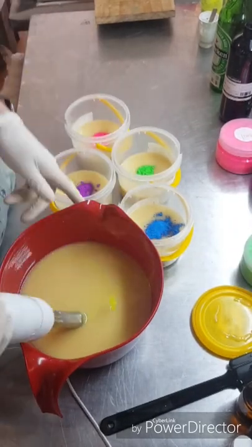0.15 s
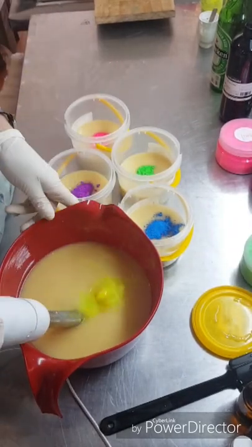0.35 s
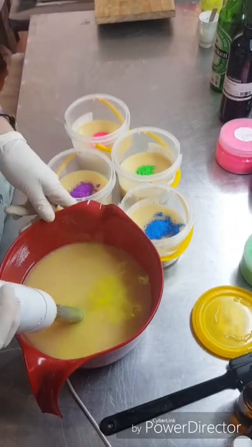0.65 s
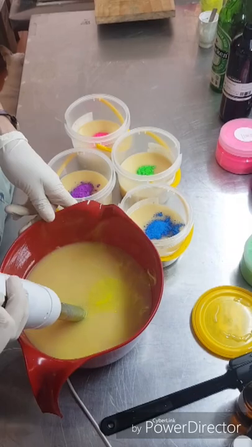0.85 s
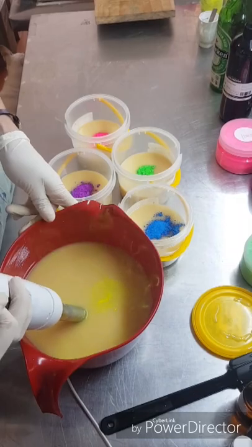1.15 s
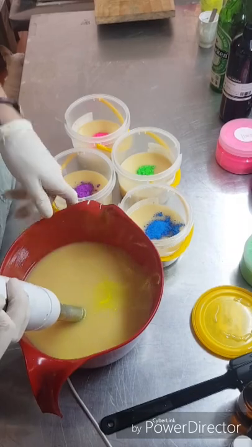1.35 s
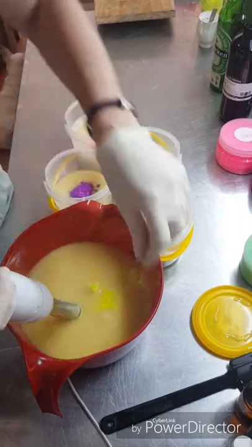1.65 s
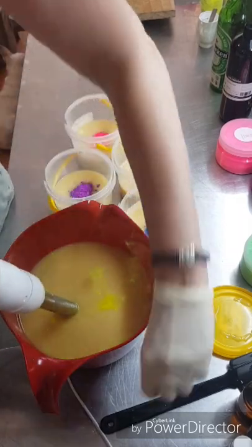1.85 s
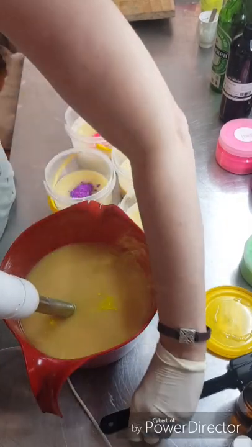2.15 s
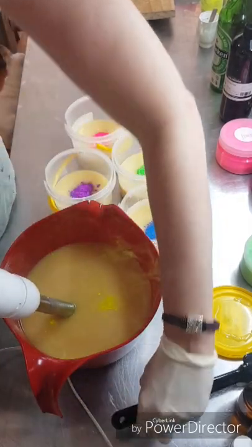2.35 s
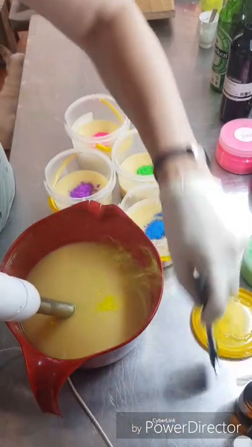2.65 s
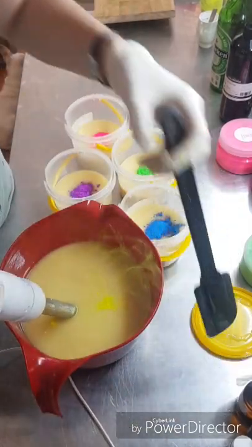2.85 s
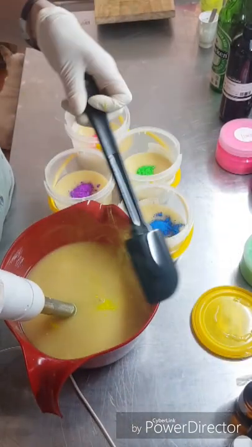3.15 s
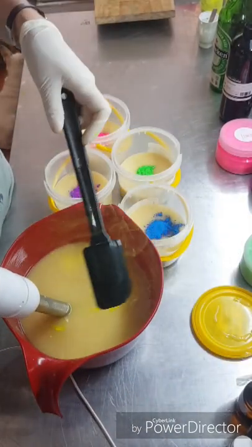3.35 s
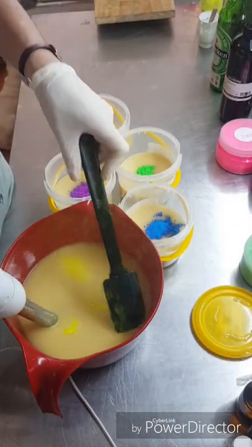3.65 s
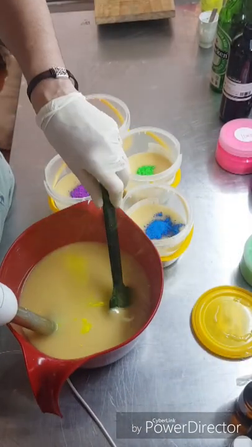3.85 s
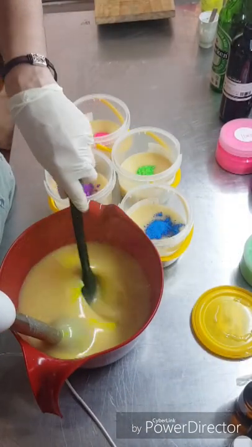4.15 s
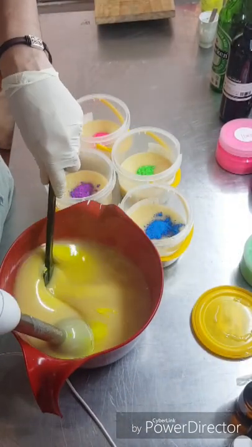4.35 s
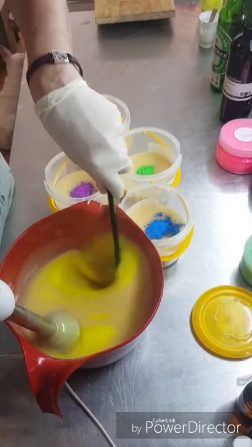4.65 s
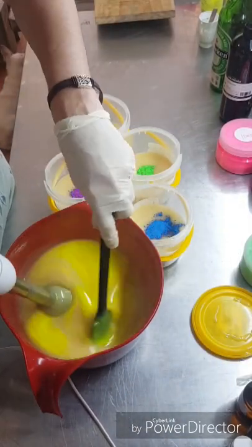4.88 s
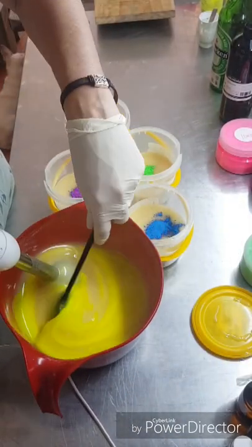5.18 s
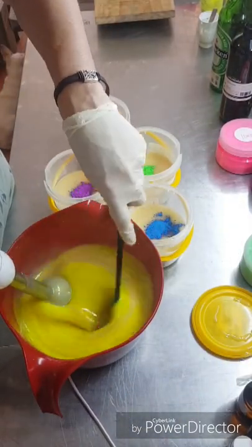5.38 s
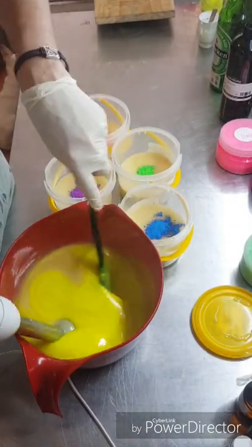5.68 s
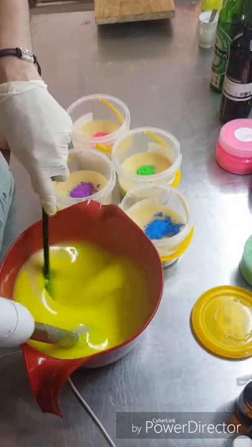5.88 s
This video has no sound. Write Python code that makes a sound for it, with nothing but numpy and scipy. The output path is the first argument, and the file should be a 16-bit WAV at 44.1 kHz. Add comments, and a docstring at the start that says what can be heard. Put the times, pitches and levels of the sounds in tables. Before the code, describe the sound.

Hollow, chattering clacks with thin metal rings and a dull jug bump open the scene, with one small rising bubble. A stick blender then makes a short throbbing burst and a longer one in thick batter. After a pause with faint rubbing on steel comes another short-long pair, settling to a buzz. Soft quick knocks and tiny wet crackles of stirring follow. Close stereo microphones, small workroom, low hum.

```python
"""A stick blender runs in four presses in a plastic jug of thick batter, on a steel table close to two microphones.
Tones, churning and brushes follow one shaft speed: the blades gulp air and throb; longer presses settle to a buzz.
Loose ware rattles as decaying knocks and metal rings; the jug thumps when bumped and bubbles chirp upwards.
A spatula rubs the steel, squeaks and stirs with faint wet crackles of short noise.
Beneath it all, a small workroom holds a low hum and steady noise."""
import sys
import numpy as np
from scipy import signal
from scipy.fft import rfft, irfft, next_fast_len
from scipy.io import wavfile
from scipy.ndimage import uniform_filter1d

SR = 44100
rng = np.random.default_rng(int(sys.argv[2]) if len(sys.argv) > 2 else 0)


def store_pcm(level_fs):
    """Save levels as 16-bit WAV."""
    pcm = np.round(np.clip(level_fs, -1, 1) * 32767).astype(np.int16)
    wavfile.write(sys.argv[1], SR, np.atleast_2d(pcm).T)


N = 265482


def amp(db):
    """Decibels to gain."""
    return 10 ** (np.asarray(db) / 20)


def unit(x):
    """Scales to rms 1."""
    return x / np.sqrt(np.mean(x ** 2) + 1e-20)


def read(points, hz):
    """Reads a spectrum on a log-frequency axis."""
    f, value = np.transpose(points)
    return np.interp(np.log(hz + 1), np.log(f + 1), value)


def add(mix, s, sound):
    """Mixes a sound in at time s."""
    part = mix[..., max(round(s * SR), 0):][..., :sound.shape[-1]]
    part += sound[..., :part.shape[-1]]


def colour(x, gain):
    """Filters with a gain given as a function of frequency."""
    size = next_fast_len(x.shape[-1] + 2048)
    spectrum = rfft(x, size) * gain(np.fft.rfftfreq(size, 1 / SR))
    return irfft(spectrum, size)[..., :x.shape[-1]]


def wander(rate_hz):
    """Smooth random drift of rms 1."""
    return unit(colour(rng.standard_normal(N), lambda hz: np.exp(-(hz / rate_hz) ** 2)))


def lag(x, seconds):
    """Follows x with a time constant."""
    keep = np.exp(-1 / (seconds * SR))
    return signal.lfilter([1 - keep], [1, -keep], x)


def resonance(hz, centre_hz, width_hz):
    """Bell of height 1 around a resonance."""
    return 1 / (1 + (2 * (hz - centre_hz) / width_hz) ** 2)


# likeness of the two microphones: (frequency [Hz], left-right correlation [-1 to 1])
LIKENESS = [(60, -0.14), (140, 0.6), (330, 0.27), (500, 0.42), (770, 0), (1200, -0.06), (2700, 0.25),
            (4200, -0.03), (15000, 0)]


def noise(spectrum, peaks=(), size=N):
    """Coloured noise of rms 1 at both microphones, their likeness set band by band."""
    a, b = rng.standard_normal((2, size))
    same = lambda hz: np.clip(read(LIKENESS, hz), -1, 1)
    right = colour(a, same) + colour(b, lambda hz: np.sqrt(1 - same(hz) ** 2))
    lift = lambda hz: sum(db * resonance(hz, f, width) for f, width, db in peaks)
    return unit(colour(np.array([a, right]), lambda hz: amp(read(spectrum, hz) + lift(hz))))


def fade(t, t60):
    """Free decay, 60 dB in t60."""
    return np.exp(-np.log(1000) * t / t60)


def ring(modes, t, vary_db=1):
    """Struck modes, a little different at every blow."""
    out = 0
    for k, (hz, db, t60) in enumerate(modes):
        level = amp(db + vary_db * rng.standard_normal())
        out = out + (-1) ** k * level * fade(t, t60) * np.sin(2 * np.pi * hz * t)
    return out


def room(x, wet_db=-13, t60=0.095, near_db=-9):
    """Early echoes off the table and nearby things, then a short tail."""
    t = np.arange(SR // 2) / SR
    taps = rng.choice([-1., 1.], (2, len(t))) * (rng.random((2, len(t))) < 3000 / SR)
    early = taps * (t > .001) * fade(t, 0.063)
    late = taps * (t > .012) * fade(t, t60)
    echoes = sum(amp(db) * h / np.linalg.norm(h, axis=1, keepdims=True)
                 for db, h in ((near_db, early), (wet_db, late)))
    return x + signal.oaconvolve(np.atleast_2d(x), echoes, axes=1)[:, :N]


# share of a phase offset given to each of the two microphones: ([share])
SIDES = np.array([[.5], [-.5]])
# low hum: (frequency [Hz], rms level [dB], phase between the microphones [rad])
HUM = [(48.2, -58, 0.72), (103.1, -55, 0.47), (126, -69.5, 1.2)]
# steady noise of the workroom: (frequency [Hz], level per Hz [dB])
ROOM_NOISE = [(12, -47.5), (20, -17.5), (106, -6), (129, -16), (153, -21), (245, -35), (315, -28.5),
              (416, -36), (491, -37), (811, -46), (3260, -54.5), (4430, -55.5), (7110, -59), (12800, -53.5),
              (15500, -64)]


def background():
    """An appliance hums, its level drifting, over the room's steady noise."""
    t = np.arange(N) / SR
    hum = 0
    for hz, db, apart in HUM:
        phase = 2 * np.pi * (hz * t + rng.random()) + apart * SIDES
        hum = hum + amp(db + .8 * wander(10)) * np.sqrt(2) * np.sin(phase)
    return hum + amp(-57) * noise(ROOM_NOISE)


# loose ware knocks on the table: (time [s], level [dB], metal ring level relative to the knock [dB])
KNOCKS = [(0.005, -28.5, -16), (0.087, -41.5, -19), (0.152, -41.5, -21), (0.197, -48, -26),
          (0.265, -46.5, -29), (0.407, -23.5, -14.5), (0.47, -33.5, -48), (0.485, -28.5, -16),
          (0.624, -26.5, -15), (0.704, -30, -18.5), (2.283, -36, -26), (2.368, -41, -24.5),
          (2.47, -53, -27), (2.553, -46.5, -23.5), (3.757, -42, -18), (3.823, -43, -19.5),
          (3.901, -35.5, -18.5), (3.976, -40, -16.5), (4.049, -39.5, -20), (4.118, -44, -23),
          (4.19, -42, -20.5), (4.263, -48, -22.5), (4.322, -44.5, -26), (4.806, -57.5, -27),
          (5.149, -42, -20.5), (5.236, -41.5, -19.5), (5.319, -55, -26), (5.903, -48, -29)]
# hollow modes of a knock: (frequency [Hz], level [dB], t60 [s])
KNOCK_MODES = [(110.7, -29, 0.27), (171.2, -20, 0.15), (243, -34.5, 0.3), (565, -5, 0.02),
               (648, -25.5, 0.028), (713, -5.5, 0.027), (1010, -5, 0.012), (1125, -3.5, 0.0139)]
# modes of the loose metal: (frequency [Hz], level [dB], t60 [s])
RING_MODES = [(2745, 0, .155), (3300, -14, 0.135), (5640, -27, .06)]
# chatter within each knock: (nominal delay [s], level [dB])
CONTACTS = [(0, 3), (.0039, -1.5)]
CLACK_RISE_S, RING_RISE_S = .003, .001
DETUNE, UNEVEN = .04, .25  # largest share by which a knock's pitch and chatter gap vary
HARD_DB, BRIGHTEN = -47, 0.98  # knocks softer than HARD_DB lose this many dB of upper ring per dB


def rattle(soft_hz=1400):
    """Each knock is a hollow, chattering clack from the table and a thin metal ring, duller when soft."""
    clacks, rings, t = np.zeros(N), np.zeros((2, N)), np.arange(SR // 3) / SR
    soft = signal.butter(5, soft_hz, fs=SR, output="sos")
    for s, db, ring_db in KNOCKS:
        pitch, gap = 1 + np.array([DETUNE, UNEVEN]) * rng.uniform(-0.95, 1, 2)
        clack = ring(KNOCK_MODES, t * pitch) * np.minimum(t / CLACK_RISE_S, 1)
        clack = signal.sosfilt(soft, clack)
        for delay, contact_db in CONTACTS:
            add(clacks, s + gap * delay, amp(db + contact_db) * clack)
        upper = amp(BRIGHTEN * min(db - HARD_DB, 0))
        metal = np.array([ring(RING_MODES[:1], t) + upper * ring(RING_MODES[1:], t) for side in SIDES])
        add(rings, s, amp(db + ring_db - 8.5) * np.minimum(t / RING_RISE_S, 1) * metal)
    return room(clacks, wet_db=-17, t60=0.2, near_db=-4) + rings


# resonances of jug and blender stem: (frequency [Hz], width [Hz], lift [dB])
BODY = [(460, 50, 8.5), (506.6, 64, 3.5), (708.4, 140, 3), (1375, 52, 10.5), (1580, 150, 12.5),
        (1859, 330, 14), (2093, 110, 6.5), (2760, 140, -6), (4260, 41, -0.5), (5050, 110, 4),
        (6260, 120, 6.5)]
# blender head or spatula bumps the jug:
# (time [s], level [dB], thump relative to the bump [dB], bright click relative to the bump [dB])
BUMPS = [(.324, -62, 21.5, -43), (0.338, -42.5, 9, -34), (0.546, -41.5, 8.5, -24), (2.143, -74.5, 22, 3),
         (2.629, -78, -6.5, 15.5), (3.792, -57.5, 1, -11.5), (4.377, -64, 14, 12), (5.825, -57, 11, -20.5),
         (5.862, -64, 5, -20)]
# dull plastic clatter: (frequency [Hz], level per Hz [dB])
CLATTER = [(150, -64), (250, 3.5), (509, -10.5), (577, 0), (763, -1), (1430, -22.5), (1890, -24.5),
           (2050, -24.5), (2330, -16.5), (7000, -46.5), (9100, -75), (15400, -120)]
# jug on the table: (frequency [Hz], level [dB], t60 [s])
THUMP_MODES = [(65, 1.5, .38), (131, -4.5, 0.4), (185, -6, 0.2), (350, -7.5, 0.092)]
# thump at the left, then the right microphone: (level [dB])
THUMP_SIDES_DB = [
    [-6],
    [1],
]


def bumps():
    """The full jug answers a bump with a low thump, a dull plastic clatter and a click."""
    out, t = np.zeros((2, N)), np.arange(SR // 2) / SR
    click_spectrum = [(2200, -29), (4200, 14.0), (6000, 9), (7500, -15.0), (12000, -21)]  # (Hz, dB per Hz)
    for s, db, thump_db, click_db in BUMPS:
        clatter = noise(CLATTER, BODY, size=len(t)) * (fade(t, 0.064) + 0.71 * fade(t, .32))
        click = noise(click_spectrum, size=len(t)) * (fade(t, 0.018) + 0.17 * fade(t, 0.19))
        thump = amp(THUMP_SIDES_DB) * ring(THUMP_MODES, t) * (1 - np.exp(-t / 0.0038))
        cushion = 1 - np.exp(-t / 0.00033)  # the batter softens the contact
        bump = cushion * clatter + amp(click_db - 3.5) * click + amp(thump_db) * thump
        add(out, s, amp(db) * bump)
    return out


# bubbles reaching the surface: (time [s], level [dB], length [s], first pitch [Hz], last pitch [Hz])
BUBBLES = [(0.36, -38.5, 0.032, 545, 1016), (5.499, -63, .025, 628, 796)]


def bubbles():
    """Air pockets ring with a note that rises as they reach the surface."""
    out = np.zeros(N)
    for s, db, length, first_hz, last_hz in BUBBLES:
        hz = np.linspace(first_hz, last_hz, int(length * SR))
        add(out, s, amp(db) * np.sin(2 * np.pi * np.cumsum(hz) / SR) * np.hanning(len(hz)))
    return out


# button presses: (on [s], off [s], top speed before sag [Hz], churning [dB], brush hiss [dB],
# shaft shake [dB], motor buzz [dB], whine [dB], first bite [dB], run-down shudder [dB],
# time the blades need to run clear of air, if still pressed [s])
PRESSES = [(.905, 1.097, 178.8, -28.5, -47, -16, -31, -34, -39.5, -42.5, .4),
           (1.195, 1.642, 179.8, -27.5, -49.5, -28.5, -36.5, -33.5, -26, -37.5, .27),
           (2.702, 2.891, 175.8, -29.5, -48.5, -40, -35, -33.5, -34, -44, .4),
           (3.002, 3.553, 178.1, -30.5, -50, -35, -31, -33, -21, -34, .2)]
SPIN_UP_S, COAST_S = .037, .128  # time constants of the shaft speed, with and without current
CLEAR_S = 0.012  # how fast the air clears
ROUGH_AIRY, ROUGH_CLEAR = 0.64, .1  # roughness (0-1) in airy and in clear batter


def motor():
    """Speed, current, roughness: a press races up and coasts down on release; only longer ones clear their air."""
    t = np.arange(N) / SR
    speed, current, clear = np.zeros((3, N))
    for on, off, top_hz, *_, clear_after in PRESSES:
        first = round(on * SR)
        held = np.clip(t[first:], on, off) - on
        released = np.maximum(t[first:] - off, 0)
        spun_up = top_hz + (speed[first] - top_hz) * np.exp(-held / SPIN_UP_S)
        speed[first:] = spun_up * np.exp(-released / COAST_S)
        pressed = (t >= on) & (t < off)
        current += pressed
        clear += pressed * (.5 + .5 * np.tanh((t - on - clear_after) / CLEAR_S))
    rough = ROUGH_AIRY + (ROUGH_CLEAR - ROUGH_AIRY) * lag(clear, .03)
    return speed, lag(current, 0.002), np.clip(rough, 0, 1)


def press_levels():
    """The level columns of the latest press at every moment, smoothed where they step."""
    rows = np.array(PRESSES)
    latest = np.maximum(np.searchsorted(rows[:, 0], np.arange(N) / SR) - 1, 0)
    return uniform_filter1d(rows[latest, 3:-1].T, size=600, axis=1)


# the blades gulp a pocket of air: (start [s], length [s], throb twice a turn [dB],
# throb four times a turn [dB], extra churning [dB])
GULPS = [(.988, 0.038, -21, -31.5, 3), (1.038, .012, -39.5, -23, 5.5), (1.054, 0.036, -24.5, -33.5, 3),
         (1.245, .05, -26, -44, 1.5), (1.308, 0.036, -21.5, -33.5, 2), (1.371, 0.055, -28.5, -39, 0.5),
         (2.795, 0.044, -28.5, -48, 3), (2.837, 0.051, -23.5, -47, -0.5), (3.067, 0.078, -36, -29, 1),
         (3.136, 0.051, -27.5, -35.5, -0.5)]
GULP_ATTACK_S, GULP_RELEASE_S = 0.02, .012


def gulps():
    """Each air pocket is a brief swell: gains of the two throbs, and dB added to the churning."""
    t = np.arange(N) / SR
    twice, four, extra = np.zeros((3, N))
    for start, length, twice_db, four_db, extra_db in GULPS:
        attack = np.clip((t - start) / GULP_ATTACK_S, 0, 1)
        swell = attack * np.exp(-np.maximum(t - start - length, 0) / GULP_RELEASE_S)
        twice += amp(twice_db) * swell
        four += amp(four_db) * swell
        extra += extra_db * swell
    return twice, four, extra


def shaft_tone(angle, order, blur, blur_hz=30, apart=0.89):
    """A multiple of the shaft speed, blurred by uneven load and out of step at the two microphones."""
    phase = order * angle + 2 * np.pi * rng.random() + apart * SIDES
    steady = np.sqrt(2 * (1 - blur ** 2))
    in_step = (steady + blur * wander(blur_hz)) * np.cos(phase)
    return in_step + blur * wander(blur_hz) * np.sin(phase)


SETTLE_S = 0.057  # the shaft tone builds this slowly once the air has cleared


def shaft_shake(angle, fast, swirl, current, rough, shake_db):
    """Unbalance and blade forces grow quickly with speed; air in the blades weakens the steady tone."""
    force = fast ** 1.3 * swirl ** 1.3 * lag(current, .015)
    settled = lag(np.maximum(ROUGH_AIRY - rough, 0), SETTLE_S)
    steadiness = 1 - 1.1 * ROUGH_AIRY + 1.2 * settled
    return amp(shake_db) * force * steadiness * shaft_tone(angle, 0.99, rough ** 2, apart=0.9)


SHUDDER_HZ, SHUDDER_WIDTH_HZ = 100, 37


def run_down_shudder(angle, speed, fast, swirl, current, shudder_db):
    """The coasting shaft passes through the stem's own resonance."""
    coasting = (1 - current) * (swirl > fast)
    nearness = np.exp(-((speed - SHUDDER_HZ) / SHUDDER_WIDTH_HZ) ** 2)
    tone = shaft_tone(angle, 1, .5, blur_hz=35, apart=1.8)
    return amp(shudder_db) * lag(coasting, 0.011) * nearness * tone


def blade_beat(angle, fast, rough, buzz_db, throb, overtone):
    """Two blades beat twice a turn, and throb at two and four times a turn on gulped air."""
    twice = (amp(buzz_db - 3) * fast ** 3 + throb) * shaft_tone(angle, 2, rough ** 3, apart=0.35)
    return amp(-3.5) * (twice + overtone * shaft_tone(angle, 4, rough))


# motor buzz: (multiple of the shaft speed, level [dB])
BUZZ = [(3, 1), (4, 3.5), (5, -3.5), (6, -14.5), (7, -2), (8, -15.5), (9, -17), (10, -27), (12, -17),
        (14, -25)]


def motor_buzz(angle, fast, drive, rough, buzz_db):
    """Shaft harmonics that grow with speed and weaken while the batter is airy."""
    harmonics = sum(amp(db) * shaft_tone(angle, order, rough) for order, db in BUZZ)
    return amp(buzz_db - 2.5) * fast ** 3 * drive * (1 - rough ** 2) * harmonics


# resonances of the motor shell: (frequency [Hz], width [Hz], level [dB])
SHELL = [(2483, 270, 3.5), (3240, 1100, -6), (3200, 180, 1.5), (4520, 210, -14), (5400, 300, -11.5)]


def motor_whine(angle, fast, current, rough, mains, whine_db, surge_db=5):
    """Armature-slot overtones sweep through the shell's resonances, throbbing with the mains."""
    slots = shaft_tone(angle, 16, rough, blur_hz=70)
    slots = slots + amp(-5) * shaft_tone(angle, 24, rough ** .25, blur_hz=260)
    slots = slots + .5 * fast * shaft_tone(angle, 32, .5 * rough)
    slots = slots + amp(3.5) * rough * rng.standard_normal((2, N))  # the brushes scrape the same shell
    shell_gain = lambda hz: sum(amp(db) * resonance(hz, f, width) for f, width, db in SHELL)
    shell = colour(slots * (1 + 0.52 * mains), shell_gain)
    # the motor whines only while current flows, and draws most as it starts
    return amp(whine_db - 5.5 + surge_db * (1 - fast)) * current * fast ** 1.5 * shell


# churning batter: (frequency [Hz], level per Hz [dB])
CHURN = [(470, -36.5), (800, -2), (1320, 0.5), (1440, -9.5), (1890, -8.5), (2350, -2.5), (2850, -4.5),
         (3630, -11.5), (5600, -15), (6790, -34), (8000, -52.5), (10400, -74.5), (17600, -120)]
# low slosh of the batter: (frequency [Hz], level per Hz [dB])
SLOSH = [(60, -16), (130, -14.5), (200, -3), (250, -20.5), (330, 1.5), (420, -8.5), (560, -9), (700, 1),
         (900, -2.5), (1150, -7), (1800, -35)]


def churning(angle, fast, swirl, drive, rough, mains, churn_db, gulp_db, slosh_db=4.5):
    """Collapsing pockets of air make the stirred batter lumpy and grainy, over a low slosh."""
    # the shaft chatters in its bearing, one uneven blow a turn
    turn, within = np.divmod(angle / (2 * np.pi), 1)
    blow_db = 3.8 * np.clip(rng.standard_normal(N), -2, 2)
    blows = amp(blow_db)[turn.astype(int)] * np.exp(-within / 0.75)
    lumps = amp(1.5 * rough * wander(45) + 1.4 * wander(700)) * (1 + 0.3 * rough * blows)
    stirred = amp(churn_db + gulp_db) * drive * swirl ** 0.87
    churn = amp(-1.5) * stirred * fast ** 2.01 * noise(CHURN, BODY) * lumps * (1 + 0.022 * mains)
    slosh_gain = amp(slosh_db - 14 * (1 - rough) ** 2 + .8 * gulp_db)
    slosh = slosh_gain * stirred * fast ** 1.79 * noise(SLOSH, BODY) * amp(2.3 * rough * wander(40))
    return churn + slosh


# brush hiss: (frequency [Hz], level per Hz [dB])
BRUSHES = [(6000, -33), (8000, -2), (9500, 2.5), (11000, 6), (13000, 1.5), (15200, -15)]


def brush_hiss(fast, swirl, drive, mains, brush_db, gulp_db):
    """Brushes hiss with the speed, flickering quickly and throbbing slightly with the mains."""
    level = amp(brush_db + 0.85 * gulp_db) * drive * fast ** 1.9 * swirl ** .6
    return level * noise(BRUSHES) * (1 + 0.082 * mains) * amp(.7 * wander(900))


# sparks and dry bearing rasp: (frequency [Hz], level per Hz [dB])
SPARKS = [(1500, -16.5), (3000, -2.5), (4500, -1), (6000, -8), (8000, -15), (12000, -15), (15500, -23.5)]


def sparks_and_bearing(fast, current, stall_db=-57, rasp_db=-52):
    """The commutator sparks while current meets a slow shaft; the dry bearing rasps with speed."""
    return (amp(stall_db) * current * (1 - fast) + amp(rasp_db) * fast ** 2) * noise(SPARKS)


BITE_HZ = 108.1  # above this speed the blades rasp, for as long as they outrun the batter


def first_bite(speed, fast, swirl, bite_db):
    """The blades catch batter that still turns more slowly than they do."""
    slip = np.maximum(fast - swirl, 0) * np.clip((speed - BITE_HZ) / 6, 0, 1)
    return amp(bite_db) * slip * noise(CHURN, SHELL)


SWIRL_S = 0.057  # the batter follows the blades with this time constant
SAG = .04  # share of the speed lost at roughness 1


def blender(coast_db=-2.5):
    """A mains motor spins two blades: tones on the shaft speed, churning batter, sparks and brushes."""
    speed, current, rough = motor()
    churn_db, brush_db, shake_db, buzz_db, whine_db, bite_db, shudder_db = press_levels()
    throb, overtone, gulp_db = gulps()
    speed = speed * (1 - SAG * rough ** 2)
    jitter = (.001 + 0.0045 * rough) * wander(30)
    angle = 2 * np.pi * np.cumsum(speed * (1 + jitter)) / SR
    fast = speed / speed.max()
    swirl = lag(fast, SWIRL_S)
    drive = amp(coast_db * (1 - lag(current, 0.0067)))  # softer once the motor stops pushing
    mains = np.cos(2 * np.pi * 100 * np.arange(N) / SR)
    out = shaft_shake(angle, fast, swirl, current, rough, shake_db)
    out = out + run_down_shudder(angle, speed, fast, swirl, current, shudder_db)
    out = out + blade_beat(angle, fast, rough, buzz_db, throb, overtone)
    out = out + motor_buzz(angle, fast, drive, rough, buzz_db)
    out = out + motor_whine(angle, fast, current, rough, mains, whine_db)
    out = out + sparks_and_bearing(fast, current) + first_bite(speed, fast, swirl, bite_db)
    out = out + churning(angle, fast, swirl, drive, rough, mains, churn_db, gulp_db)
    return out + brush_hiss(fast, swirl, drive, mains, brush_db, gulp_db)


# the gloved hand drags the spatula over the steel: (start [s], length [s], level [dB])
SCRAPE = (1.9, .85, -77.5)
# what rings in the steel top: (frequency [Hz], level per Hz [dB])
STEEL = [(1200, -5), (1750, -6.5), (1950, 3), (2200, -11), (2600, 6), (3200, -22), (4200, -2), (5200, -19),
         (8000, -40.5)]
SCRAPE_RISE_S, SCRAPE_FALL_S = 0.24, 0.04


def scrape():
    """A faint uneven rub that sings in the steel top."""
    start, length, db = SCRAPE
    t = np.arange(N) / SR - start
    stroke = np.clip(np.minimum(t / SCRAPE_RISE_S, (length - t) / SCRAPE_FALL_S), 0, 1)
    return amp(db + wander(25)) * stroke * noise(STEEL)


# glove and spatula squeak: (time [s], level [dB], length [s], centre [Hz], width [Hz])
SQUEAKS = [(2.121, -66.5, 0.075, 1940, 253), (3.929, -81, 0.15, 4970, 700),
           (5.248, -75.5, 0.07, 1890, 1200), (5.463, -87, 0.18, 2990, 344),
           (5.809, -69.5, 0.042, 2360, 900)]


def squeaks():
    """Short rubs, each a fuzzy band of sound."""
    out = np.zeros((2, N))
    for s, db, length, centre_hz, width_hz in SQUEAKS:
        hiss = rng.standard_normal((2, int(length * SR)))
        rub = colour(hiss, lambda hz: resonance(hz, centre_hz, width_hz))
        add(out, s, amp(db) * unit(rub) * np.hanning(rub.shape[1]))
    return out


# the spatula parts the batter with a clear wet snap: (time [s], level [dB])
CRACKLES = [(4.0482, -58), (4.1944, -63), (4.376, -55), (4.6274, -56.5), (4.6544, -61), (5.2579, -60),
            (5.434, -56.5), (5.5802, -56.5)]
# colour of a snap: (frequency [Hz], level per Hz [dB])
CRACKLE = [(3000, -19), (7000, -21), (9300, 5.5), (11500, 4.5), (15000, -1)]
# strokes that scatter further snaps: (start [s], length [s], middle level [dB])
STROKES = [(4.415, 0.5, -63.5), (5.363, 0.38, -64.5)]
SNAPS_PER_S, SNAP_SPREAD_DB = 20, 4  # spread is either side of the stroke's level


def stirring():
    """Tiny films of batter snap behind the spatula: a few clear ones, and a scatter along each stroke."""
    out, t = np.zeros((2, N)), np.arange(SR // 8) / SR
    scattered = []
    for start, length, db in STROKES:
        for place, size in rng.random((round(length * SNAPS_PER_S), 2)):
            scattered.append((start + length * place, db + SNAP_SPREAD_DB * (2 * size - 1)))
    for s, db in list(CRACKLES) + scattered:
        snap = noise(CRACKLE, size=len(t)) * (fade(t, 0.017) + 0.38 * fade(t, 0.18))
        add(out, s, amp(db - 10) * snap)
    return out


def scene():
    """Blender, handling sounds and room."""
    handling = room(bumps() + bubbles() + stirring() + squeaks())
    return background() + rattle() + handling + blender() + scrape()


# left microphone: (frequency [Hz], level [dB])
LEFT = [(60, -1), (300, 1.5), (1000, -2), (2000, -1), (5500, 1.5), (7000, 3), (8200, 5), (9700, 8),
        (10500, 6.5), (13000, 4)]
# right microphone: (frequency [Hz], level [dB])
RIGHT = [(60, 2), (300, 3.5), (1000, 1), (2000, 3), (5500, 6.5), (7000, 4), (8200, -6), (9700, -15),
         (10200, -4), (13000, 1.5)]
EDGE_HZ = 15500  # upper band limit


def record(dry, low_cut_hz=40):
    """Each microphone has its own colour and a bass cut; the sound has a narrow gap at 7.5 kHz and a band limit."""
    gap_db = lambda hz: -20 / (1 + ((hz - 7500) / 90) ** 2)
    bass_cut = lambda hz: hz ** 4 / (hz ** 4 + low_cut_hz ** 4)
    colour_db = lambda hz: np.array([read(LEFT, hz), read(RIGHT, hz)])
    heard = colour(dry, lambda hz: bass_cut(hz) * amp(colour_db(hz) + gap_db(hz)))
    band_limit = signal.firwin(511, EDGE_HZ, window=("kaiser", 9), fs=SR)
    return signal.oaconvolve(heard, band_limit[None], "same")


dry = scene()
out = record(dry)
store_pcm(out)
```